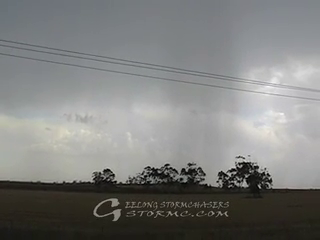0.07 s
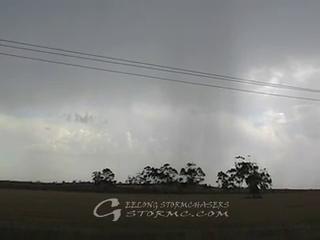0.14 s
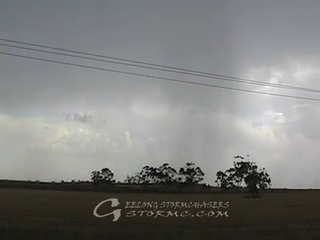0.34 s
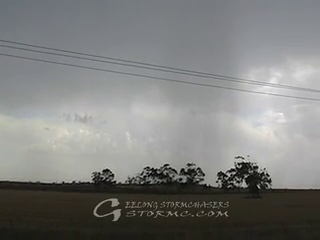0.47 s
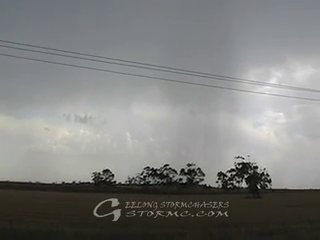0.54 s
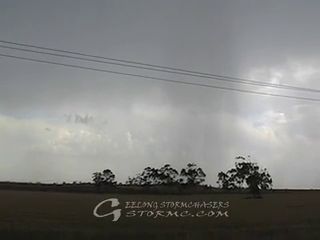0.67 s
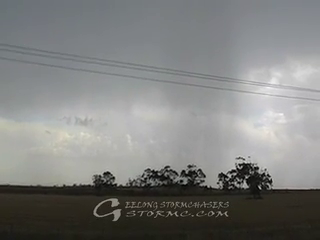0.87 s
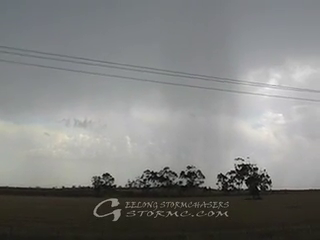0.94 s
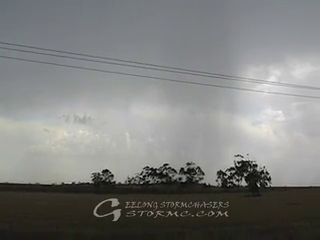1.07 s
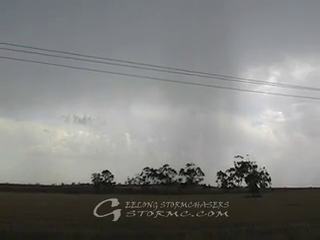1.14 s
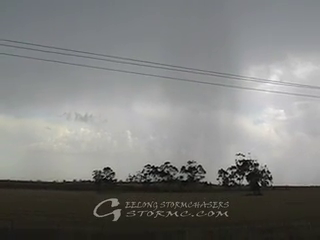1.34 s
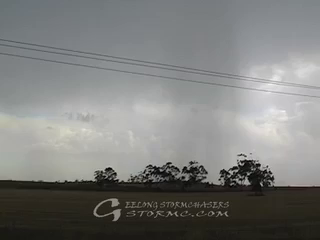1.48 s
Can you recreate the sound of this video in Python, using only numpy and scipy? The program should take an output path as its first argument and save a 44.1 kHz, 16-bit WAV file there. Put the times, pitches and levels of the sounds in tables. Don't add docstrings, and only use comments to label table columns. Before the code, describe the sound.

Thunder outdoors, muffled and bass-heavy. A low rumble leads to a sudden cluster of hard booms at 0.2-0.4 s, a brief dip, then another heavy burst at 0.5-0.7 s. Softer, uneven thuds follow near 0.95, 1.05, 1.15, 1.26 and 1.4 s, fading. Wind buffets the stereo microphone; faint high cricket trills, tiny drop ticks, thin hiss and slight motor whine lie underneath.

```python
import sys
import numpy as np
from scipy import signal
from scipy.fft import rfft, irfft, next_fast_len
from scipy.io import wavfile
from scipy.ndimage import uniform_filter1d

SR = 44100
rng = np.random.default_rng(int(sys.argv[2]) if len(sys.argv) > 2 else 0)


def volts_from_decibels(level):
    exponent = np.asarray(level, float) / 20
    return 10 ** exponent


def digitize_waveform(pressure):
    field = np.atleast_2d(pressure).T
    bounded = np.clip(field, -1, 1)
    quanta = np.round(bounded * 32767).astype(np.int16)
    wavfile.write(sys.argv[1], SR, quanta)


N = 66150
OPPOSITE = np.array([[1], [-1]])


def rms1(x):
    return x / np.sqrt(np.mean(x ** 2))


def filtered(x, order, hz, kind="low"):
    return signal.sosfilt(signal.butter(order, hz, kind, fs=SR, output="sos"), x)


def colour(x, table, rings=()):
    size = next_fast_len(2 * N)
    f = np.maximum(np.fft.rfftfreq(size, 1 / SR), 1)
    points = np.array(table, float)
    log_f = np.log(np.maximum(points[:, 0], 1))
    log_gain = np.interp(np.log(f), log_f, points[:, 1]) * np.log(10) / 20
    cepstrum = irfft(log_gain, size)
    cepstrum[1:size // 2] *= 2
    cepstrum[size // 2 + 1:] = 0
    gain = np.exp(rfft(cepstrum))
    for hz, width, db in rings:
        gain = gain * (1 + volts_from_decibels(db) / (1 + 1j * (f * f - hz * hz) / (f * width)))
    return irfft(rfft(x, size) * gain, size)[..., :N]


def walk(rate):
    hold = int(SR / rate)
    steps = np.interp(np.arange(N) / hold, np.arange(400), rng.standard_normal(400))
    return 0.43 * uniform_filter1d(steps, hold)


def thunder_roll(t):
    # t/s, level/dB, extra treble/dB
    roll = np.array([(0, -32, 6), (.05, -26.5, 2), (.2, -33.5, 3.5), (.232, -31.5, 8.5),
                     (.236, -18.5, -0.5), (0.316, -21.5, -1), (0.328, -14, -14.5), (0.383, -18.5, 1.5),
                     (.39, -25.5, 2.5), (0.479, -22.5, 2), (0.559, -25, 0.5), (0.602, -13, -6),
                     (0.662, -20.5, -3), (.78, -25.5, 4), (.9, -30, 1.5), (1.118, -24.5, 1), (1.3, -30, 3),
                     (1.5, -32, -2.5)], float)
    # f/Hz, level/dB
    air = [(30, -17.5), (90, -13.5), (200, -7), (310, -10), (450, -8.5), (800, -17.5), (1600, -26),
           (2600, -46.5)]
    # f/Hz, width/Hz, gain/dB
    rings = [(180, 28.6, 6), (253.5, 10.7, 8), (384, 90, -6), (471.7, 25, 1), (641, 11.7, -20),
             (805, 64, -0.5), (1051, 93, -4.5), (1329, 27, -0.5)]
    shocks_per_s, spread_db = 2500, 0.5
    flicker_db, flicker_per_s, treble_hz = 0.2, 48, 550

    chance, sign, size = rng.random((3, N))
    shocks = (chance < shocks_per_s / SR) * np.sign(sign - .5) * volts_from_decibels(-spread_db * np.log(1 - size))
    shocks = shocks / np.sqrt(uniform_filter1d(shocks ** 2, size=1800) + 1e-9)
    heard = colour(shocks, air, rings)
    heard_rms = np.sqrt(uniform_filter1d(heard ** 2, size=1300, origin=-150))
    level_db = np.interp(t, roll[:, 0], roll[:, 1]) + flicker_db * walk(flicker_per_s)
    shocks = shocks * volts_from_decibels(level_db) / heard_rms
    treble = filtered(shocks, 2, treble_hz, "high")
    treble_gain = volts_from_decibels(np.interp(t, roll[:, 0], roll[:, 2]))
    return colour(shocks + treble * (treble_gain - 1), air, rings)


def deep_rumble():
    # f/Hz, level/dB
    deep = [(15, -8), (35, -5), (70, 6), (120, 5), (250, -50), (1000, -109)]
    return volts_from_decibels(-44.5) * rms1(colour(rng.standard_normal(N), deep))


def thunder_booms(t):
    # t/s, peak level/dB, f/Hz, length/cycles
    strokes = [(0.21, -8.5, 93.5, 0.82), (0.232, -19, 440, 3.3), (0.262, -9, 130, 2),
               (0.307, -6, 222, 0.77), (.3235, -5, 190, 2.6), (.348, -9, 215, 2.2),
               (.338, -15.5, 430, 3.85), (0.363, -9, 227, 3.3), (0.374, -7.5, 215, 2.16),
               (0.487, -9, 187, 2.6), (0.505, -6, 200, 1.7), (.515, -14.5, 248, 1.25),
               (.562, -20.5, 540, 3.1), (0.595, -5.5, 159, 1.82), (0.6051, -6, 240.5, 5.5),
               (0.6372, -4.5, 180, 2.9), (0.672, -12.5, 202, 2.8), (0.718, -15, 203, 1.4),
               (0.759, -14.5, 209, 2.64), (.945, -15.5, 84, 2.04), (1.033, -12.5, 178, 1.6),
               (1.091, -19, 104, 1.8), (1.152, -16.5, 239, 3.1), (1.264, -14.5, 231, 2.8),
               (1.395, -15, 205, 1.32), (1.471, -23, 180, 3.16)]
    overtone_db, duck_db, cut_hz = -13, -8, 163
    booms, duck = 0, 1
    for s, db, hz, cycles in strokes:
        phase = (t - s) * hz
        env = np.clip(np.minimum(phase, (cycles - phase) * 0.52) * 2, 0, 1)
        duck = duck * volts_from_decibels(duck_db * env)
        tone = np.sin(2 * np.pi * phase) + volts_from_decibels(overtone_db) * np.sin(3.7 * np.pi * phase)
        booms = booms + volts_from_decibels(db) * env * tone
    return filtered(booms, 1, cut_hz, "high"), duck


def thunder(t):
    swarm = thunder_roll(t) + deep_rumble()
    booms, duck = thunder_booms(t)
    bass = signal.sosfiltfilt(signal.butter(2, 510, fs=SR, output="sos"), swarm)
    return swarm + (duck - 1) * bass + booms


def wind(t):
    # t/s, length/s, level/dB, left minus right/dB
    gusts = [(0.076, 0.039, -34.5, -6), (0.201, 0.06, -23, 5.5), (0.261, 0.024, -12, 1),
             (0.293, 0.059, -41.5, 2), (0.37, 0.023, -51, 2), (0.469, 0.056, -42.5, 21),
             (0.549, 0.057, -34, -18), (0.708, 0.032, -24, -4), (0.764, .14, -35, 1.5),
             (0.934, .045, -19.5, 1.5), (1.013, 0.031, -34, 0), (1.074, 0.04, -22, -0.5),
             (1.146, 0.044, -26.5, 8.5), (1.182, 0.028, -46, 19), (1.294, 0.022, -68, -12),
             (1.407, 0.013, -62, 35)]
    # f/Hz, level/dB
    turbulence = [(15, -29), (40, -16.5), (75, 4.5), (130, -1), (265, -11.5), (450, -18.5), (700, -28.5),
                  (1500, -48.5)]
    breeze_db, edge_s, common_db = -60, 0.0092, -10.5
    split_hz, reference_db, steepness = 210, -17, 1
    slap_s, slap_hz, slap_db = .2645, 169, -9

    push = rms1(colour(rng.standard_normal(N), turbulence))
    common = rms1(colour(rng.standard_normal(N), turbulence))
    push = push / np.sqrt(uniform_filter1d(push ** 2, size=900))
    env = np.full((2, N), volts_from_decibels(breeze_db))
    for s, length, db, pan_db in gusts:
        edge = np.minimum(t - s, (s + length - t) / 2 + edge_s) / edge_s
        env = env + np.clip(edge, 0, 1) ** 2 * volts_from_decibels(db + pan_db * OPPOSITE / 2)
    high = filtered(push, 2, split_hz, "high")
    push = push + high * ((env / volts_from_decibels(reference_db)) ** steepness - 1)
    phase = np.clip((t - slap_s) * slap_hz, 0, 1)
    slap = -volts_from_decibels(slap_db) * np.sin(np.pi * phase) * np.sin(2 * np.pi * phase)
    return (env * push + slap) * OPPOSITE + env * volts_from_decibels(common_db) * common


def cricket(t):
    # centre of first pulse t/s, pulse spacing/s
    trills = [(.042, .0535), (.302, .0326), (.770, .0318), (1.202, .0336)]
    counts = [5, 11, 10, 9]
    levels = [-54.5, -53, -55, -54.5]
    tone_hz, sweep_hz, arch_hz = 3804, 310, 120
    pulse_s, swell_db, octave_db = 0.022, 2, -22
    out = np.zeros(N)
    for (s, gap), count, db in zip(trills, counts, levels):
        length = pulse_s * (gap / 0.028) ** 0.36
        for k, (late, sharp, loud) in enumerate(rng.standard_normal((count, 3))):
            x = (t - s - k * gap - 0.00057 * late) / length
            env = np.clip(x + 0.8, 0, 1) * np.clip((.35 - x) * 6, 0, 1)
            glide = tone_hz * (1 + 0.0037 * sharp) * x - sweep_hz * x * x / 2 - arch_hz * x ** 3 / 3
            phase = 2 * np.pi * length * glide
            level = volts_from_decibels(db + 0.66 * loud + swell_db * np.sin(np.pi * (k + .5) / count))
            out += level * env * (np.sin(phase) + volts_from_decibels(octave_db) * np.sin(2 * phase))
    return out


def drops(t):
    # t/s, peak level/dB
    impacts = [(0.2674, -53.5), (0.3864, -47), (0.5154, -58), (0.6164, -45), (0.9357, -40), (1.249, -40),
               (1.3832, -37), (1.4011, -40), (1.4174, -49)]
    tick_hz, tick_s = 9600, .00008
    out = 0
    for s, db in impacts:
        since = t - s - .0006
        out = out + volts_from_decibels(db) * np.exp(-(since / tick_s) ** 2) * np.cos(2 * np.pi * tick_hz * since)
    return out


def gritty_noise(channels):
    return rng.standard_normal((channels, N)) * volts_from_decibels(2.5 * walk(250))


def far_insects():
    centre_hz, width_hz, level_db = 7520, 300, -74
    band = [centre_hz - width_hz / 2, centre_hz + width_hz / 2]
    return volts_from_decibels(level_db) * rms1(filtered(gritty_noise(1)[0], 2, band, "band"))


def motor_whine(t):
    # f/Hz, level/dB
    lines = [(2400, -70), (2700, -81.5), (5400, -80.5), (6492, -85)]
    return sum(volts_from_decibels(db + 1) * np.sin(2 * np.pi * hz * t) for hz, db in lines)


def hiss():
    # f/Hz, level/dB
    middle = [(1500, -31.5), (2000, 5), (2700, 0.5), (4300, -3.5), (10500, -6.5), (12000, -12.5),
              (13500, -19), (14400, -31)]
    # f/Hz, level/dB
    difference = [(600, -2.5), (2000, -14), (4000, -13), (10500, -18), (13400, -15), (14400, -33)]
    level_db, side_db = -55.5, -9
    noise = gritty_noise(2)
    side = volts_from_decibels(side_db) * rms1(colour(noise[1], difference)) * OPPOSITE
    return volts_from_decibels(level_db) * (rms1(colour(noise[0], middle)) + side)


def scene():
    scatter_s, scatter_hz, scatter_db, soft_hz = .031, 500, -40, 2160
    t = np.arange(N) / SR
    storm = thunder(t)
    late = np.interp(t - scatter_s, t, storm)
    scattered = volts_from_decibels(scatter_db) * filtered(late, 2, scatter_hz, "high")
    soft = filtered(storm + scattered * OPPOSITE + wind(t), 3, soft_hz)
    return soft + cricket(t) + drops(t) + far_insects() + motor_whine(t) + hiss()


def roll_off(x):
    return signal.sosfilt(signal.butter(12, 14230, fs=SR, output="sos"), x)


def record(dry):
    limit_db, ratio, attack_s, release_s, ceiling = -17, 5.2, 0.017, 0.041, .7
    a, r = 1 / (attack_s * SR), 1 / (release_s * SR)
    power = signal.lfilter([a], [1, a - 1], np.mean(dry, axis=0) ** 2)
    over = np.maximum(power / volts_from_decibels(2 * limit_db), 1)
    log_over = signal.lfilter([r], [1, r - 1], np.log(over))
    gain = np.exp(-log_over * (1 - 1 / ratio) / 2)
    return roll_off(np.clip(dry * gain, -ceiling, ceiling))


dry = scene()
out = record(dry)
digitize_waveform(out)
```